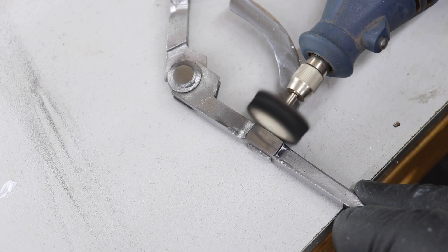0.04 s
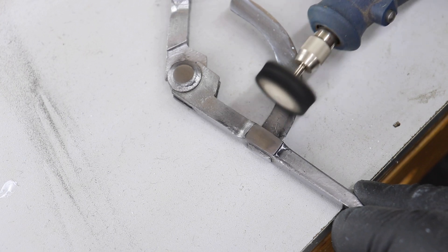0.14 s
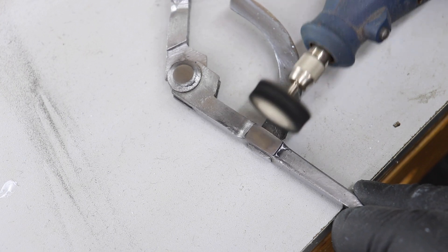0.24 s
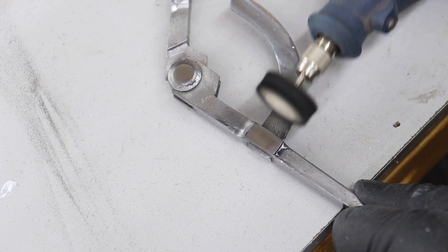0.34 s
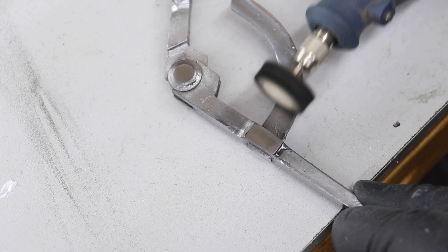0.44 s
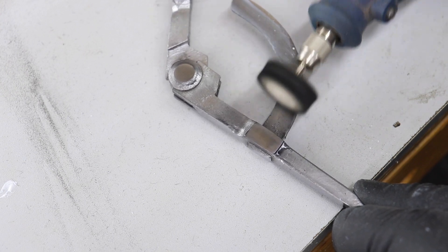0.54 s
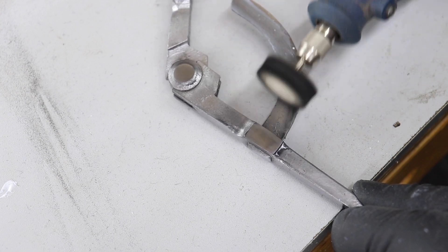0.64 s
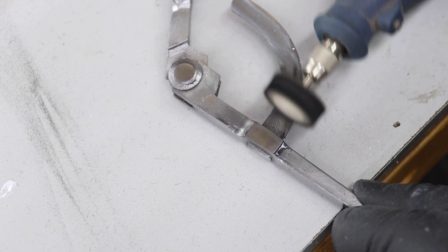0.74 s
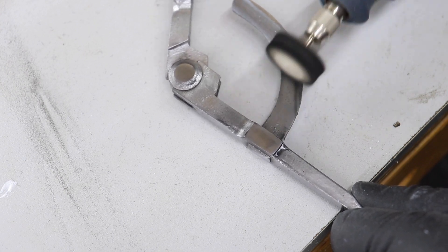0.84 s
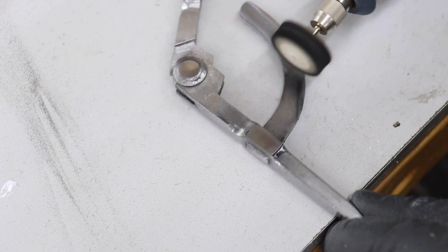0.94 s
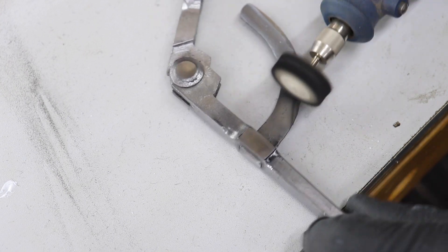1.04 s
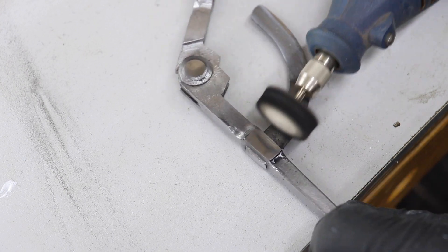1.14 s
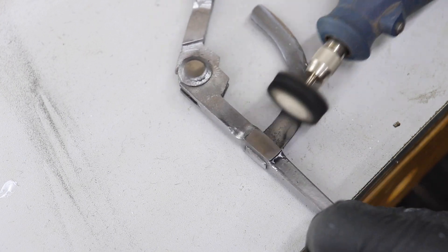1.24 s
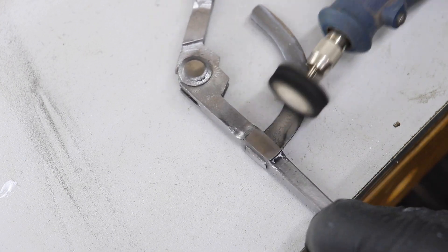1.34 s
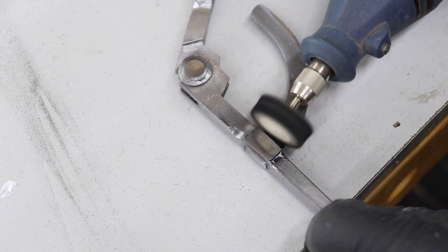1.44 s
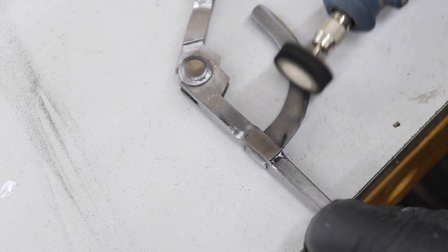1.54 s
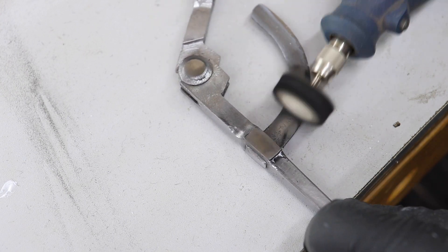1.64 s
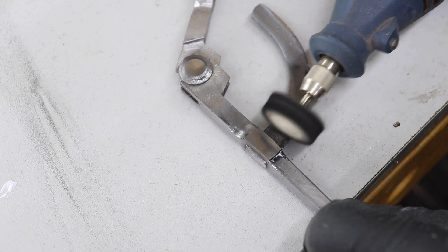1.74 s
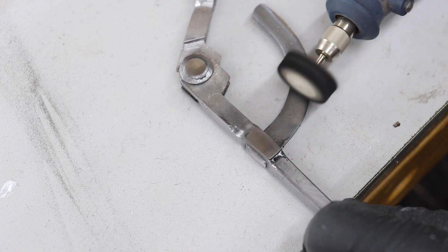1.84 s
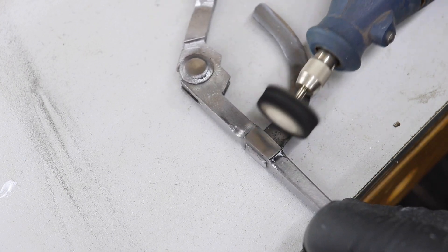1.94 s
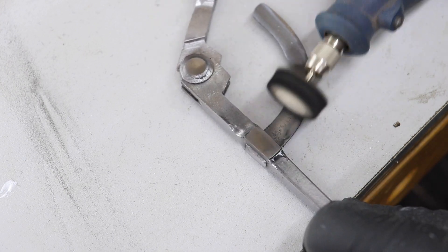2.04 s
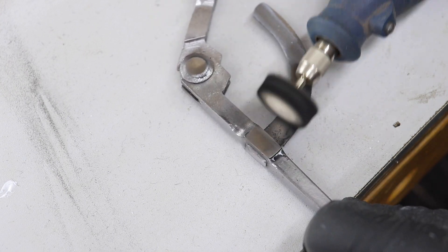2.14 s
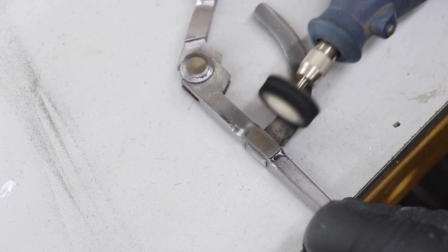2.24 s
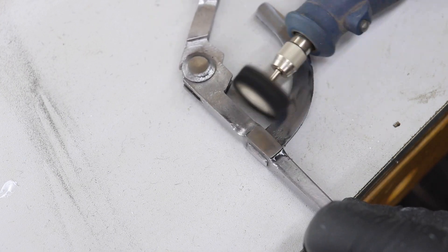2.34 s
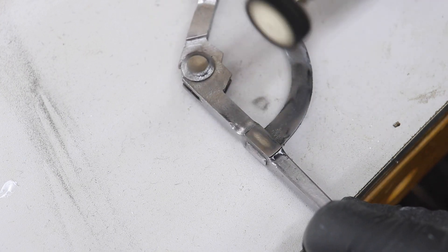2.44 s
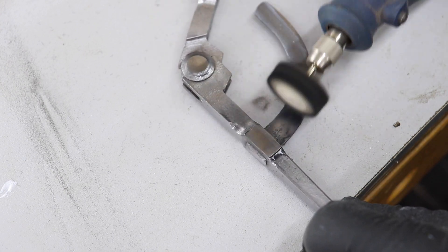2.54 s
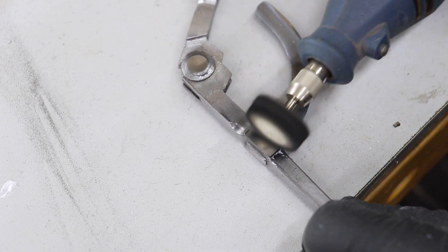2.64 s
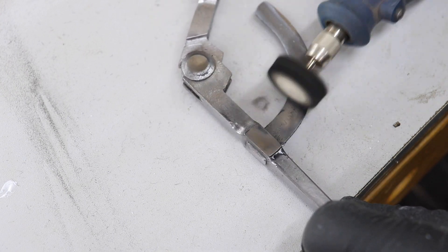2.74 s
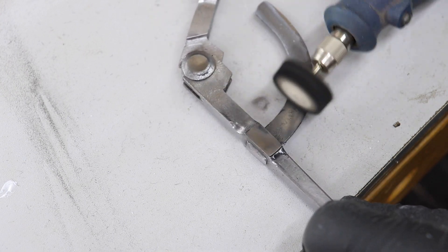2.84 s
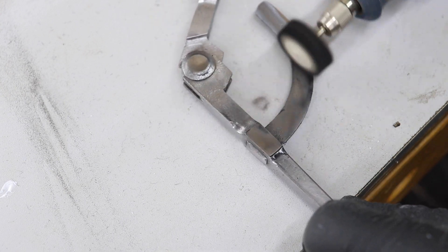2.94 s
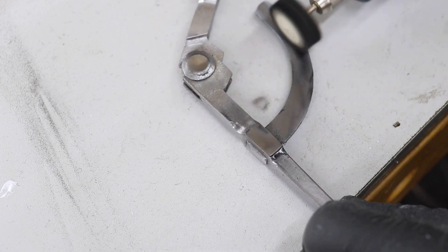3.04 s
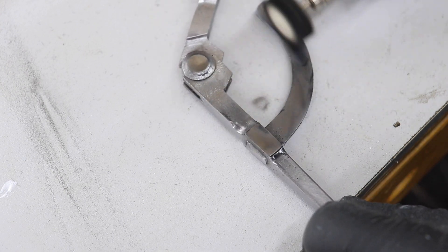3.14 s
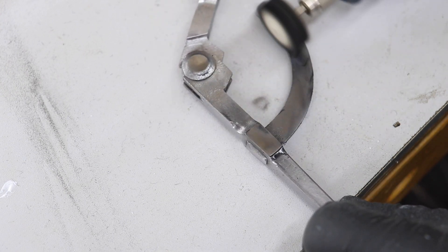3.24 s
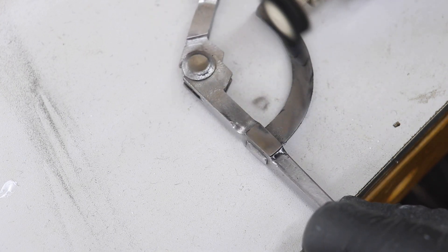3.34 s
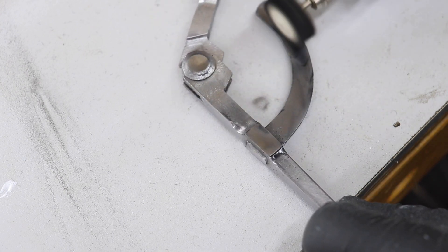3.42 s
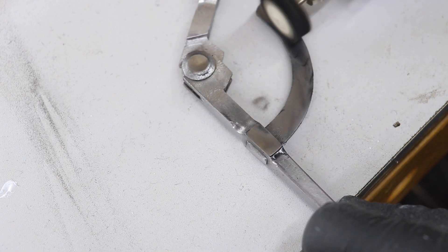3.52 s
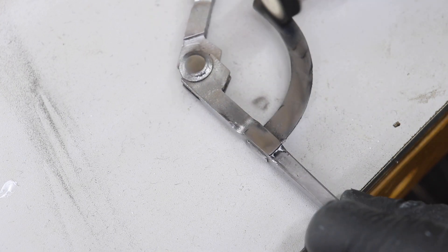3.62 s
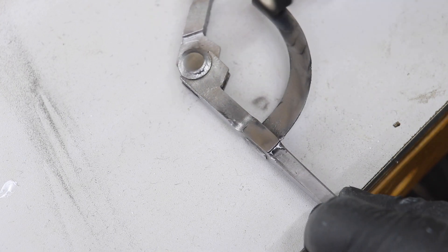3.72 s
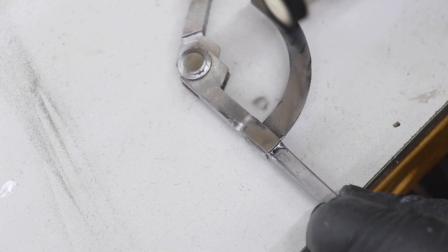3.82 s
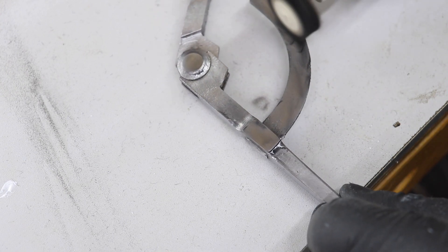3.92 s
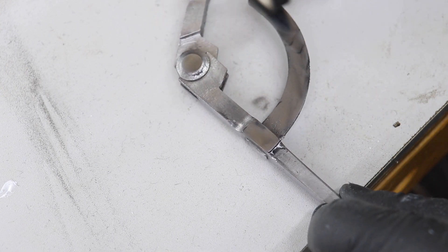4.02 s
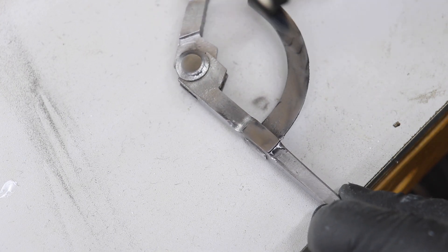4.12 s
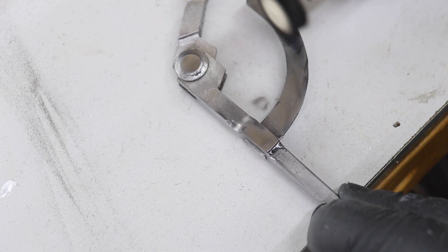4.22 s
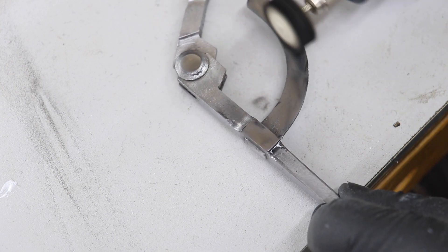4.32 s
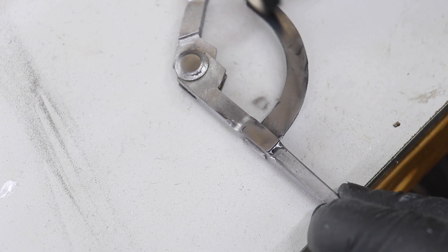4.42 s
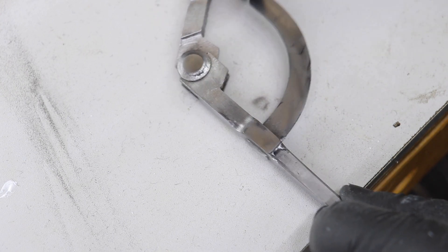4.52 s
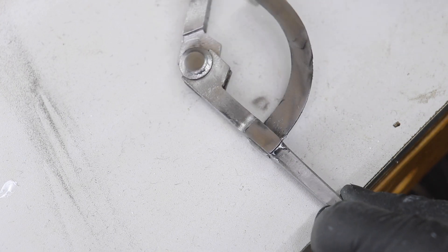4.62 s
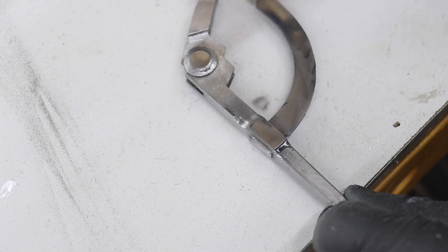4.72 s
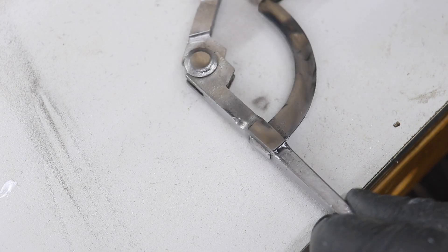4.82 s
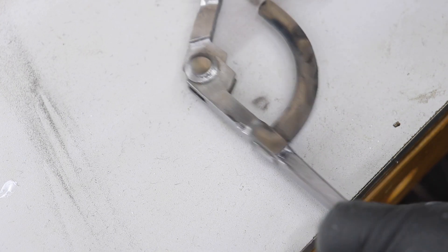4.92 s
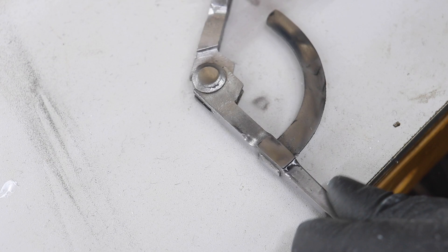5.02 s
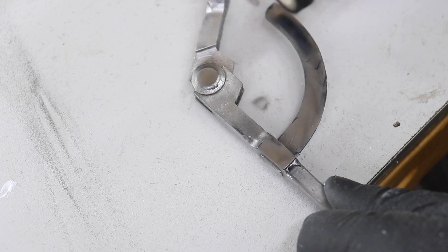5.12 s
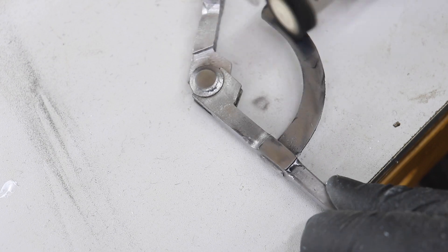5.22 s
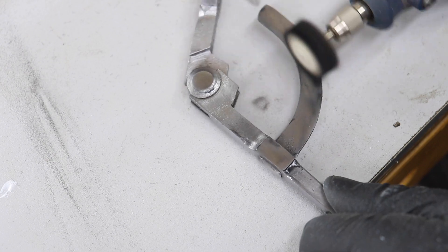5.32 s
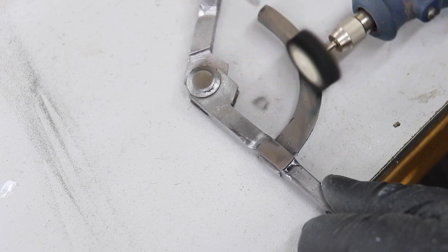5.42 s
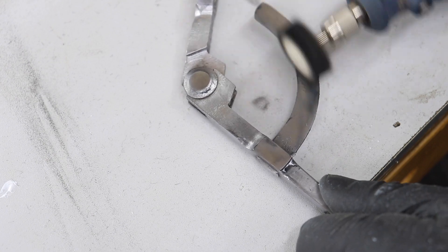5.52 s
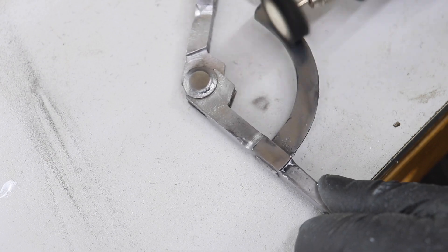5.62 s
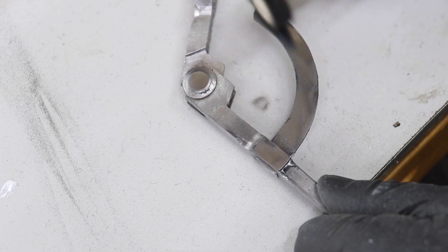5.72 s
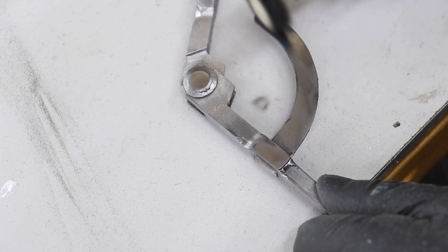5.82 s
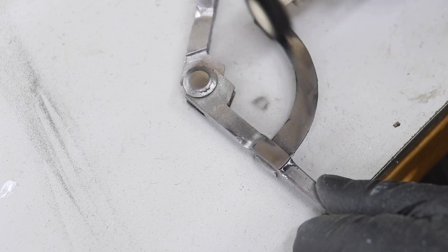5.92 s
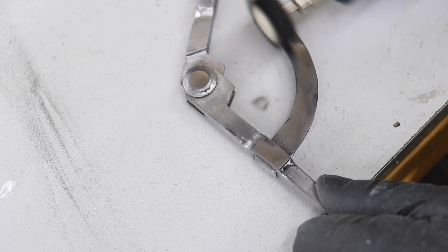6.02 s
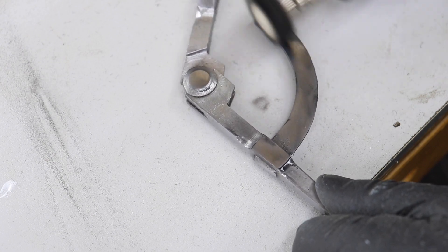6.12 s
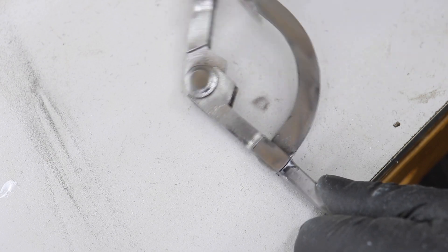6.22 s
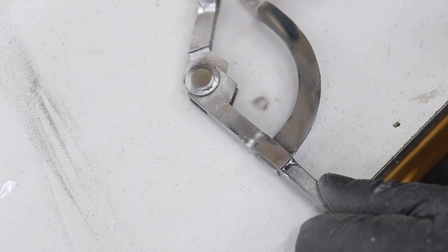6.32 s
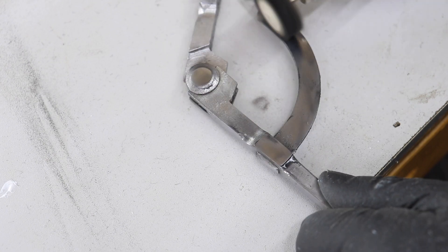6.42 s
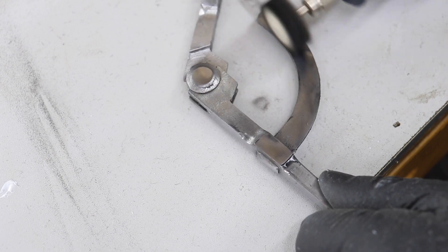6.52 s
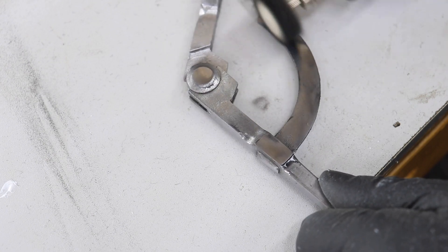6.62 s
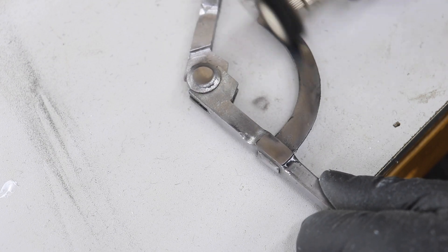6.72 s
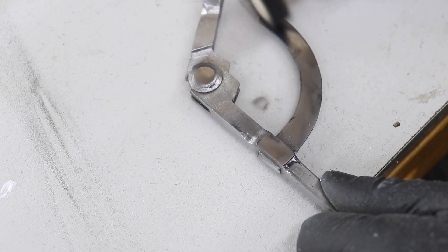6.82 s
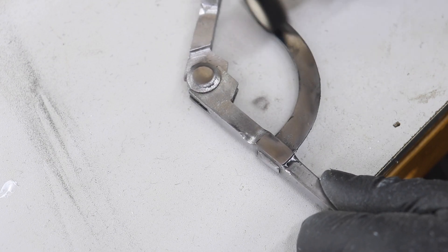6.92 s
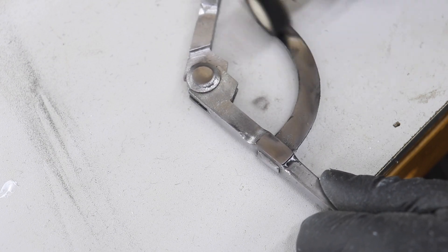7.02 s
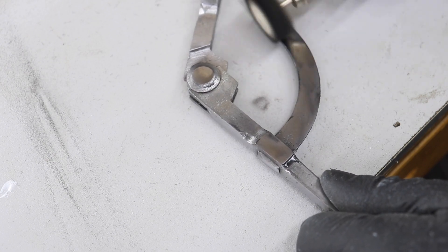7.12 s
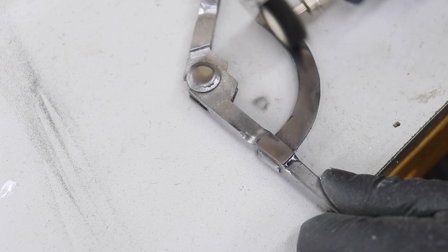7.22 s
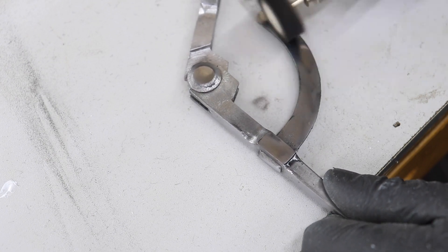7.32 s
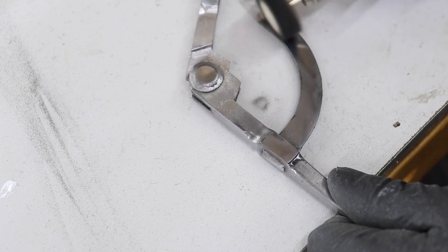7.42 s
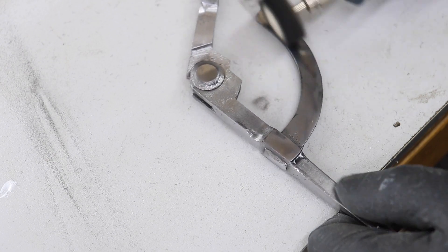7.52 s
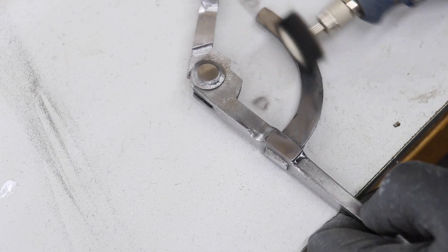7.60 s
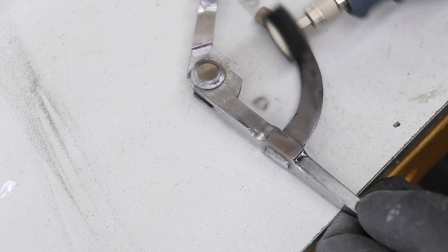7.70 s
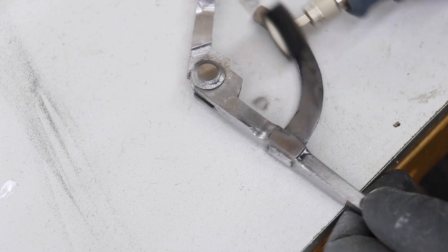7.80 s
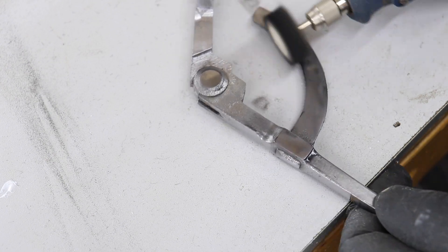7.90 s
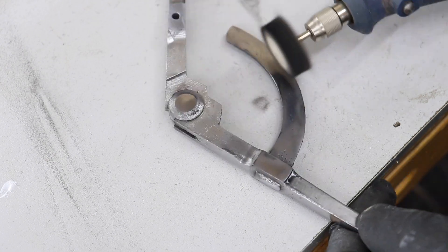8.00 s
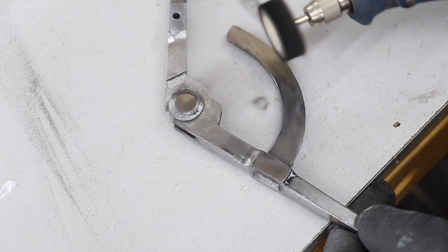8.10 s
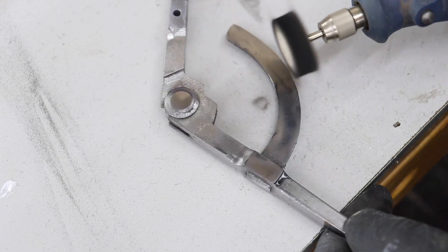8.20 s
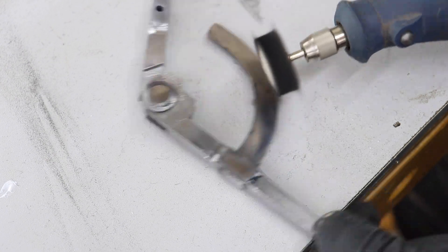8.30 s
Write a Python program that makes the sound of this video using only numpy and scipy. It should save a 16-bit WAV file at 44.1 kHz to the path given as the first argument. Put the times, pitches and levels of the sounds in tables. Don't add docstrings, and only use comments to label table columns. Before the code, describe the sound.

A small handheld rotary tool whines and buzzes close up, its pitch sagging under pressure on metal and climbing when lifted, with rattles and knocks.

```python
import sys
import numpy as np
from scipy import signal
from scipy.io import wavfile

SR = 44100
rng = np.random.default_rng(int(sys.argv[2]) if len(sys.argv) > 2 else 0)


def wav_record(signal):
    frames = np.transpose(np.atleast_2d(signal))
    bounded = np.clip(frames, -1, 1)
    quanta = np.round(bounded * 32767).astype(np.int16)
    wavfile.write(sys.argv[1], SR, quanta)


def ratio(d):
    e = np.asarray(d, float) / 20
    return 10 ** e


N = 368662
PULSE_HZ = 136.55
CUTOFF_HZ = 15700


def rms_one(x):
    return x / np.sqrt(np.mean(x ** 2) + 1e-20)


def in_time(rows):
    seconds, *columns = np.transpose(rows)
    return [np.interp(np.arange(N) / SR, seconds, column) for column in columns]


def drift(rate):
    pole = np.exp(-80 * np.pi * rate / SR)
    noise = rng.standard_normal(N // 40 + 2002)
    slow = signal.lfilter([1], [1, -2 * pole, pole * pole], noise)[2000:]
    return np.interp(np.arange(N) / 40, np.arange(len(slow)), rms_one(slow))


def band_noise(order, low_hz, high_hz):
    band = signal.butter(order, [low_hz, high_hz], "band", fs=SR, output="sos")
    return rms_one(signal.sosfilt(band, rng.standard_normal(N)))


def resonance(x, hz, width_hz):
    r = np.exp(-np.pi * width_hz / SR)
    poles = [1, -2 * r * np.cos(2 * np.pi * hz / SR), r * r]
    return signal.lfilter([(1 - r * r) / 2, 0, (r * r - 1) / 2], poles, x)


def current(sharp, lag):
    cycles = PULSE_HZ * np.arange(N) / SR - lag
    return rms_one(np.exp(sharp * np.cos(2 * np.pi * cycles)))


def orders(angle, shaft_hz, levels_db, flutter_db, rate):
    out = 0
    for order, db in levels_db.items():
        heard = np.clip((CUTOFF_HZ - order * shaft_hz) / 200, 0, 1)
        start = rng.uniform(0, 2 * np.pi)
        level = ratio(db + flutter_db * drift(rate))
        out = out + heard * level * np.sqrt(2) * np.sin(order * angle + start)
    return out


def wheel(angle, shaft_hz, unbalance_db, slap_db, flex_db, whine_db, upper_db, chatter_db):
    slap_orders = {2: -12., 3: -0.5}
    flex_orders = {4: 1, 5: -17.5, 6: -10.5, 7: -12}
    whine_orders = {8: -6.5, 9: -11.5, 10: -7.5, 11: 0, 12: -3, 13: 0}
    upper_orders = {14: -3.5, 16: -1, 15: 2, 17: -29, 18: -28.5, 20: -15, 21: -8, 22: -8.5, 23: 0, 24: -2,
                    25: -13}
    low = ratio(unbalance_db) * orders(angle, shaft_hz, {1: 0}, flutter_db=2.5, rate=14.7)
    low = low + ratio(slap_db) * orders(angle, shaft_hz, slap_orders, flutter_db=3.5, rate=14.5)
    low = low + ratio(flex_db) * orders(angle, shaft_hz, flex_orders, flutter_db=3.5, rate=15.3)
    high = ratio(whine_db) * orders(angle, shaft_hz, whine_orders, flutter_db=2.5, rate=14.7)
    high = high + ratio(upper_db) * orders(angle, shaft_hz, upper_orders, flutter_db=2.0, rate=18.4)
    loose = np.clip((chatter_db + 43.5) / 4.9, 0, 1)
    throb = current(sharp=0.88, lag=0.051) - 0.8
    return low * (1 + (0.13 + 0.5 * loose) * throb) + high * (1 + 0.17 * throb)


def motor_buzz(angle, buzz_db):
    pulses = current(sharp=3.3, lag=0)
    slots = np.sin(8 * angle) + 0.2 * rng.standard_normal(N)
    rung = rms_one(resonance(pulses * slots, hz=6080, width_hz=720))
    second = current(sharp=3.2, lag=0) * np.sin(16 * angle)
    return ratio(buzz_db - 5.0) * (rung + ratio(-4.0) * second)


def fan(angle, shaft_hz, hiss_db):
    # f/Hz, level/dB per Hz
    air_spectrum = [(180, -60), (300, -26), (698, -24), (866, -11.5), (972, -31), (1450, -17), (2500, -1),
                    (2950, -4), (4310, -4.5), (5530, 3), (6110, -1), (10900, -1), (15700, -20.5)]
    blade_orders = {16: -3, 17: -10.5, 19: -3.}
    table_hz, table_db = np.transpose(air_spectrum)
    edges = 280 * 2 ** np.arange(0, 5.9, 1 / 3)
    together = drift(7.0)
    white = rng.standard_normal((2, N))
    out = 0
    for k, (low, high) in enumerate(zip(edges, edges[1:])):
        band_filter = signal.butter(2, [low, high], "band", fs=SR, output="sos")
        band = signal.sosfilt(band_filter, white[k % 2])
        db = np.interp(np.log(low * high) / 2, np.log(table_hz), table_db)
        out = out + ratio(db + 1.4 * together + 1.43 * drift(12.0)) * band
    air = rms_one(out) * (1 + 0.29 * np.cos(angle)) * (1 + 0.061 * current(sharp=0.86, lag=0))
    tones = orders(angle, shaft_hz, blade_orders, flutter_db=1.5, rate=11.3)
    tones = tones * (1 + 0.29 * current(sharp=2.4, lag=0.086))
    return ratio(hiss_db) * (ratio(4.5) * air + tones)


def through_part(x):
    # f/Hz, width/Hz, level/dB
    part_modes = [(420, 370, -19), (1258, 430, -2.5), (1964, 334, 6.5), (2760, 280, 4.5), (3820, 460, 1),
                  (4640, 400, 4)]
    out = 0
    for k, (hz, width_hz, db) in enumerate(part_modes):
        out = out + (-1) ** k * ratio(db) * resonance(x, hz, width_hz)
    return out


def chatter(angle, chatter_db):
    taps_per_second = 2500 * current(sharp=1.1, lag=0.2) * (1 + 0.8 * np.cos(angle))
    struck = rng.random(N) < taps_per_second / SR
    taps = rng.standard_normal(N) * struck
    return ratio(chatter_db + 16.5) * rms_one(through_part(taps))


def knocks():
    # t/s, peak level/dB
    blows = [(0.987, -13.5), (1.092, -16), (1.104, -17.5), (1.134, -24), (1.188, -22), (1.228, -27.5),
             (2.445, -18.5), (2.783, -29.5), (4.64, -26), (4.85, -23), (5.22, -17), (5.313, -19),
             (5.512, -20), (6.038, -24), (6.139, -24), (6.275, -23.5), (6.335, -19), (7.967, -15.5)]
    seconds, peak_db = np.transpose(blows)
    hits = np.zeros(N)
    hits[np.round(seconds * SR).astype(int)] = ratio(peak_db)
    fade = np.exp(-1 / (0.0045 * SR))
    tail = signal.lfilter([1], [1, -fade], hits) * rng.standard_normal(N)
    scatter = hits + 0.12 * tail
    thud = ratio(26.0) * resonance(scatter, 750, 950) + ratio(13.5) * resonance(scatter, 164, 140)
    return ratio(16.5) * through_part(scatter) + thud


def bench(unbalance_db):
    # t/s, level/dB
    hands = [(0.0, -52), (0.14, -65), (0.18, -56), (0.28, -69), (0.46, -64), (0.58, -45), (0.72, -75),
             (0.79, -54), (0.88, -69), (0.95, -43), (1.05, -62), (1.19, -57), (1.53, -72), (2.72, -64),
             (2.84, -37), (3.03, -74), (3.82, -41), (3.91, -70), (4.12, -49), (4.21, -59), (4.35, -49),
             (4.72, -52), (4.8, -48), (4.91, -74), (5.01, -58), (5.17, -79), (5.4, -55), (5.49, -69),
             (5.75, -55), (5.82, -60), (5.89, -42), (5.98, -62), (6.03, -50), (6.59, -73), (6.7, -57),
             (6.99, -70), (7.38, -61), (7.5, -63), (8.03, -64), (8.22, -37), (8.36, -60)]
    hands_db, = in_time(hands)
    rumble = ratio(hands_db + 4.1 * drift(6.6)) * band_noise(2, 30, 130)
    beat = 2 * np.pi * PULSE_HZ * np.arange(N) / SR
    hum_db = -65.0 + 0.5 * (unbalance_db + 40)
    hum = ratio(hum_db) * (np.sin(beat) + ratio(-5.0) * np.sin(2 * beat))
    room = ratio(-66.5 + 2.5 * drift(7.2)) * band_noise(1, 100, 900)
    return rumble + hum + room


def scene():
    # t/s, shaft f/Hz, then level/dB of unbalance, wheel slap, part flex, bristle whine, upper whine
    wheel_curves = [(0.0, 688.2, -43, -31, -30, -26, -27), (0.67, 656.0, -54, -26, -29.5, -28, -25),
                    (0.91, 655.0, -57, -29, -28, -28, -26), (1.0, 717.8, -50, -42, -48, -36, -40),
                    (1.16, 831.5, -43, -32, -49, -39, -46), (1.28, 792.0, -57, -37, -49, -21, -37),
                    (1.35, 740.5, -44, -32, -37, -25, -34), (1.65, 640.5, -38, -38, -30, -26, -25.5),
                    (2.05, 633.5, -38.5, -36, -31, -26.5, -26), (2.35, 608.5, -42, -40, -37, -27.5, -25),
                    (2.4, 603.6, -46, -47, -52, -30, -20.5), (2.47, 560.9, -56, -45, -51, -53, -34),
                    (2.51, 632.2, -42, -50, -34, -28, -26), (2.6, 723.2, -53, -44, -49, -53, -37),
                    (2.7, 783.3, -48, -31, -42, -20.5, -42), (2.77, 735.7, -52, -48, -52, -34, -52),
                    (2.82, 725.9, -45, -34, -36, -24.5, -29), (2.89, 709.4, -34, -28.5, -26, -27, -30.5),
                    (3.05, 685.4, -33.5, -29.5, -39, -26.5, -26),
                    (3.17, 679.0, -31.5, -37, -39, -27.5, -28), (3.3, 653.0, -29, -31, -30, -27.5, -28),
                    (3.33, 649.9, -33, -33, -45, -31.5, -26), (3.61, 656.5, -32.5, -32, -26.5, -30, -31),
                    (3.65, 653.8, -32, -37, -32, -28.5, -25), (3.75, 712.3, -51, -32, -38, -38, -33),
                    (3.86, 764.6, -47, -29.5, -31, -25.5, -35), (4.28, 728.6, -49, -32.5, -26, -26, -29),
                    (4.61, 683.8, -50, -27.5, -24.5, -26.5, -28.5), (4.65, 616.6, -51, -53, -41, -39, -30),
                    (4.77, 739.2, -52, -42, -47, -47, -40), (4.98, 851.7, -41.5, -31, -43, -45, -40),
                    (5.05, 874.7, -40.5, -39, -42, -53, -46), (5.28, 934.0, -43, -39, -36, -42, -49),
                    (5.33, 934.8, -42, -30, -42, -26.5, -36), (5.45, 884.4, -43, -28, -38, -28.5, -51),
                    (5.56, 836.9, -40, -31, -42, -24.5, -38), (5.61, 820.4, -34, -25, -48, -26.5, -44),
                    (5.68, 795.7, -34.5, -34, -48, -26, -49),
                    (5.84, 758.8, -41.5, -31.5, -30.5, -23.5, -37),
                    (6.03, 699.7, -45, -34, -30, -25, -26.5), (6.19, 688.1, -43, -48, -31, -28, -24),
                    (6.24, 688.5, -46, -35, -48, -23, -26), (6.29, 630.5, -50, -58, -45, -37, -31),
                    (6.45, 763.9, -51, -39, -44, -41, -38), (6.52, 774.9, -40, -30, -26.5, -23, -35),
                    (6.61, 758.0, -41.5, -35, -24.5, -28, -48), (6.66, 737.0, -39, -35, -43, -26, -34),
                    (6.7, 720.0, -39, -17.5, -36, -36, -43), (6.77, 692.7, -32.5, -17.5, -37, -29, -34),
                    (6.89, 655.8, -36, -21, -21.5, -28, -25), (6.94, 617.3, -44, -40, -41, -37, -33),
                    (7.01, 644.8, -35, -23, -24.5, -28, -27), (7.17, 622.3, -36.5, -49, -38, -28.5, -23),
                    (7.19, 614.8, -32, -22, -50, -38, -37), (7.22, 611.3, -34.5, -32, -41, -32, -25),
                    (7.45, 611.8, -35, -32, -39, -37, -27.5), (7.47, 612.0, -29, -40, -38, -33, -27),
                    (7.54, 607.2, -32, -33, -29, -37, -27), (7.59, 608.5, -25.5, -50, -30, -28, -28),
                    (7.64, 601.8, -29, -30.5, -28.5, -42, -28), (7.91, 652.5, -30, -32.5, -36, -27.5, -25),
                    (7.99, 667.6, -28, -36, -30, -34, -30), (8.03, 676.2, -20.5, -34, -41, -27, -24.5),
                    (8.08, 718.6, -55, -48, -44, -42, -53), (8.22, 810.4, -49, -31, -43, -47, -48),
                    (8.36, 868.3, -41, -38, -36, -39, -47)]
    # t/s, then level/dB of current buzz, fan and bristle hiss, chatter of the part
    motor_curves = [(0.0, -34, -29.5, -60), (0.25, -43, -32, -64), (0.93, -33, -32.5, -66),
                    (1.0, -22, -26, -42), (1.05, -22.5, -26, -57), (1.12, -27, -25, -42),
                    (1.26, -31, -26, -62), (1.3, -29, -30.5, -58), (1.44, -32, -24, -47.5),
                    (1.53, -22, -29.5, -57), (1.77, -31, -27.5, -55), (1.86, -19, -28.5, -58),
                    (2.12, -21, -27.5, -59), (2.21, -25, -29, -62), (2.35, -13, -27.5, -61),
                    (2.42, -30, -32, -69), (2.44, -30, -34, -44), (2.58, -18, -26.5, -52),
                    (2.65, -27, -25, -62), (3.05, -38, -29.5, -42.5), (3.19, -40, -27.5, -42),
                    (3.63, -25, -27.5, -42), (3.77, -20, -26, -59), (3.82, -22, -25.5, -55),
                    (3.89, -27, -29, -64), (4.26, -25, -29.5, -63), (4.61, -26, -31.5, -62),
                    (4.65, -37, -30.5, -52), (4.72, -16, -28.5, -50), (4.8, -20, -28.5, -62),
                    (4.87, -26, -28, -41.5), (4.89, -22, -26, -62), (5.08, -30, -23.5, -57.5),
                    (5.68, -38, -27, -40), (5.75, -36, -28, -51), (5.91, -28, -29.5, -60),
                    (5.96, -20, -33, -35), (6.01, -32, -28, -63), (6.31, -32, -30.5, -51),
                    (6.33, -27, -24.5, -52), (6.38, -14, -31.5, -52), (6.43, -20.5, -30, -53),
                    (6.47, -24, -25.5, -57), (6.52, -30, -29.5, -66), (6.66, -32, -26.5, -40),
                    (6.77, -36, -27.5, -44), (6.96, -38, -29, -49), (6.99, -28, -28.5, -33),
                    (7.1, -30, -33, -62), (7.19, -33, -28.5, -40.5), (7.36, -36, -28, -45),
                    (7.45, -31, -26.5, -38.5), (7.52, -22, -27, -53), (7.61, -17, -28.5, -49),
                    (7.73, -21, -25.5, -42.5), (7.8, -29, -29, -44), (8.03, -25, -31, -50),
                    (8.1, -20, -25, -51), (8.2, -22, -26.5, -62), (8.36, -27, -23, -57)]
    shaft_hz, *wheel_db = in_time(wheel_curves)
    buzz_db, hiss_db, chatter_db = in_time(motor_curves)
    angle = 2 * np.pi * np.cumsum(shaft_hz * (1 + 0.0015 * drift(25.0))) / SR
    angle = angle + 0.0091 * np.sin(2 * np.pi * PULSE_HZ * np.arange(N) / SR + 0.77)
    tool = wheel(angle, shaft_hz, *wheel_db, chatter_db)
    tool = tool + motor_buzz(angle, buzz_db) + fan(angle, shaft_hz, hiss_db)
    mix = tool + chatter(angle, chatter_db) + knocks() + bench(wheel_db[0])
    return np.array([mix, mix])


def band_limit(x):
    return signal.sosfilt(signal.butter(12, 17070, fs=SR, output="sos"), x)


def record(dry):
    low_pass = signal.cheby2(12, 70, CUTOFF_HZ + 300, fs=SR, output="sos")
    mix = signal.sosfilt(low_pass, dry)
    return band_limit(mix)


dry = scene()
out = record(dry)
wav_record(out)
```